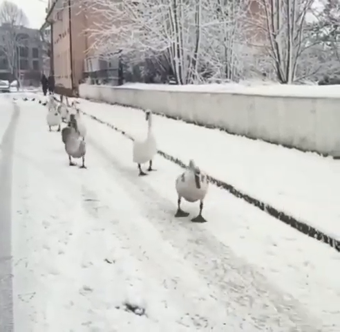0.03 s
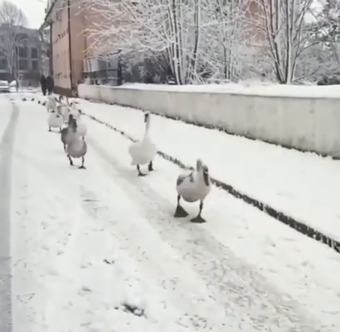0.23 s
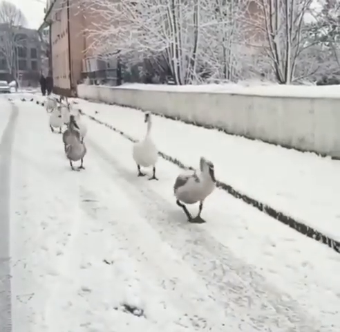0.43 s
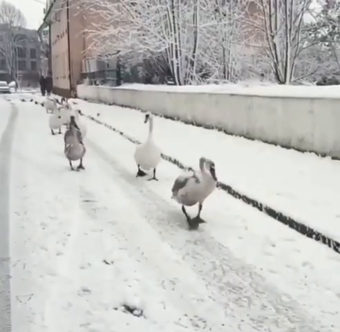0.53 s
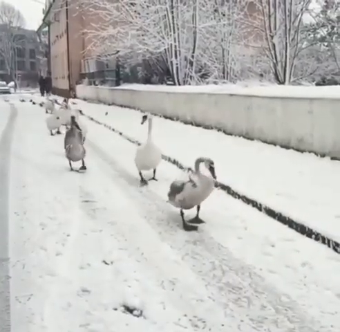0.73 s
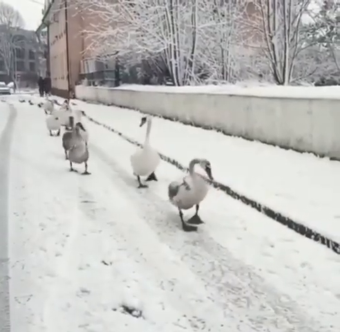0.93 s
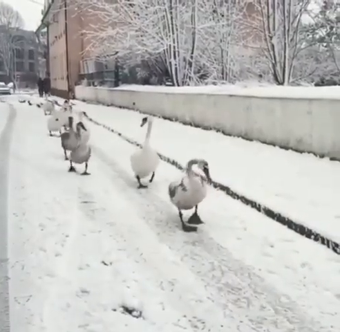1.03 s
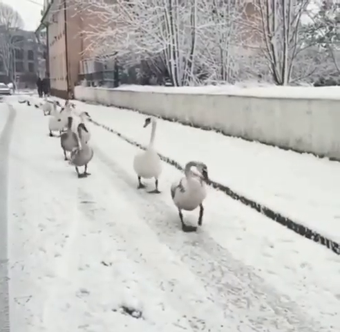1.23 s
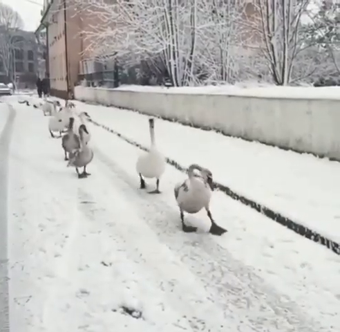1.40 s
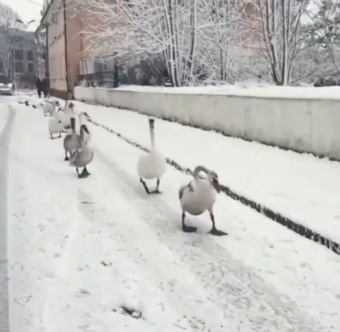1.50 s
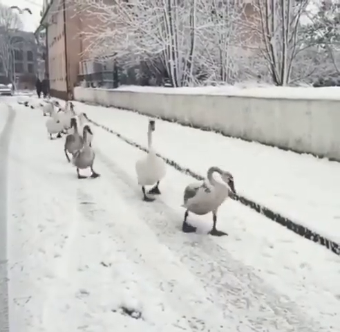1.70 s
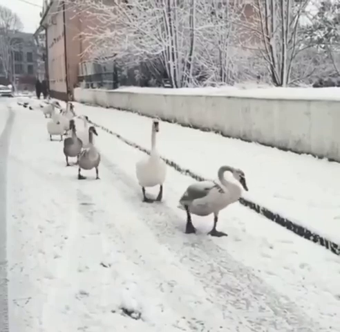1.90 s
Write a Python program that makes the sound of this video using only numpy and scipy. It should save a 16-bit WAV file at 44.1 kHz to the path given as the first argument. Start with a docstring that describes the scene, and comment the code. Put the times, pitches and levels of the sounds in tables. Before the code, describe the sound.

A young swan hisses once, harsh and fluttering, then the breath sinks in tone and fades. Soft webbed footfalls pat the snow near the end, over steady far traffic rumble outdoors; mono microphone.

```python
"""A low street rumble is heard first; a third of a second in, a young swan hisses once on a snowy street.
The hiss is rough, fluttering air noise ringing in the windpipe, whose resonances sink as the neck bends and
the breath fades. Webbed feet pat the snow as short bursts of grainy noise. Far traffic is filtered noise, an
idling engine is narrow noise bands and a wavering tone, and house fronts echo faintly. Mono microphone."""
import sys
import numpy as np
from scipy import signal
from scipy.fft import rfft, irfft, next_fast_len
from scipy.io import wavfile
from scipy.ndimage import uniform_filter1d, map_coordinates

SR = 44100
rng = np.random.default_rng(int(sys.argv[2]) if len(sys.argv) > 2 else 0)


def store_wav(level_fs):
    """Save 16-bit WAV to argv[1]."""
    pcm = np.round(np.clip(np.atleast_2d(level_fs), -1, 1) * 32767)
    wavfile.write(sys.argv[1], SR, pcm.T.astype(np.int16))


N = 85995  # length [samples]

# Course of the hiss: (time [s], level before flutter [dB], treble shelf [dB], lowest windpipe resonance [Hz],
# base frequency of the dips [Hz], mouth closing [0-1])
HISS_COURSE = [(.333, -60, 2, 930, 3150, .4), (0.343, -49.5, -3, 950, 3190, 0.33),
               (.351, -47.5, -1, 963, 3260, 0.5), (0.356, -37, -3.5, 1037, 3210, 0.26),
               (.378, -35.5, -0.5, 1106, 3260, 0), (.4, -34.5, -2.5, 1156, 3430, 0),
               (.445, -30.5, -0.5, 1151, 3410, 0), (.49, -35, -9.5, 1168, 3340, 0),
               (.52, -32, 1.5, 1152, 3372, 0.02), (.555, -34, -2, 1149, 3400, 0.02),
               (.585, -35, -4.5, 1147, 3420, 0.16), (.63, -36, -4.5, 1133, 3376, 0.22),
               (.72, -35, -2.5, 1026, 3267, 0.35), (.835, -36.5, -4, 1003, 3080, 0.61),
               (.87, -40.5, -8.5, 953, 3050, 0.83), (1.0, -43, -8, 835, 2960, 0.79),
               (1.07, -46.5, -6, 700, 2870, 0.71), (1.1, -47, -5, 682, 2710, 1),
               (1.2, -47.5, -13, 640, 2800, 0.99), (1.35, -52, -8.5, 565.5, 2730, 0.84),
               (1.5, -56.5, -12.5, 476, 2580, 0.68), (1.57, -66, -5, 428, 2600, 0.98)]
# Windpipe resonances: (multiple of the lowest [ratio], width [Hz], level with mouth open [dB],
# half closed [dB], closed [dB])
WINDPIPE = [(1.0, 51, -1, -8.5, -3.5), (1.99, 71, 4, -11, 7.5), (2.72, 55, 4, -8.5, 7),
            (3.65, 220, -3.5, -5, -16.5), (4.4, 420, -4, -8.5, -23), (4.8, 160, 1.5, -6.5, -30),
            (5.4, 80, -3.5, -2, -18), (6.38, 640, 3.5, -21, -5.5)]
# Fixed resonances of mouth and beak: (frequency [Hz], width [Hz], level with mouth open [dB],
# half closed [dB], closed [dB])
BEAK_RESONANCES = [(1450, 500, -12, -5, -13), (1800, 200, -5, -5, -8), (2050, 70, -1, 0, -10),
                   (2250, 300, -10, -4, -11), (2800, 400, -11, -8, -18), (3700, 90, -14, -6, -3),
                   (3950, 350, -12, -3, -12), (4550, 500, -14, -6, -11), (5500, 700, -11, -9, -16),
                   (6400, 900, -22, -16, -22)]
# Moving dips in the hiss spectrum: (multiple of the base dip frequency [ratio], width before breathing [Hz],
# gain with mouth open [dB], half closed [dB], closed [dB])
HISS_DIPS = [(.768, 148, -16.5, 3, -3.5), (.99, 310, -22.5, -34.5, -5), (1.352, 300, -38, 5, 0.5),
             (1.65, 128.7, -26.5, -1.5, -2), (1.97, 200, -14, -22, -10.5)]
# Upper edge of the tract: (mouth open [Hz], half closed [Hz], closed [Hz])
TRACT_TOP_HZ = (6690, 6650, 6230)
# Throat flutter: (time [s], rate before waver [Hz], depth of the puffs [ratio])
THROAT_FLUTTER = [(.35, 77, .2), (.44, 76, .7), (.52, 74, .4), (.62, 65, .6), (.72, 63, .6), (.9, 60, .1)]
# Footfalls: (time [s], peak of the envelope [dB])
FOOTFALLS = [(.975, -61), (1.139, -52), (1.374, -55.5), (1.601, -62), (1.658, -59), (1.73, -56),
             (1.795, -71)]
# Spectrum of trodden snow: (frequency [Hz], relative level [dB])
SNOW_SPECTRUM = [(400, -8), (1200, -2.5), (2200, 2), (4500, -1.5), (8000, -10.5)]
# Course of the street, before the rumble trim: (time [s], level [dB])
STREET_COURSE = [(0.0, -50), (0.276, -48), (0.884, -43.5), (0.9, -45), (1.216, -45.5), (1.548, -48),
                 (1.568, -44), (1.726, -47.5), (1.95, -48.5)]
# Spectrum of the far traffic: (frequency [Hz], relative level [dB])
RUMBLE_SPECTRUM = [(20, -28.5), (33, -10.5), (48, 0.5), (60, 1.5), (110, -2), (170, -7.5), (250, -6),
                   (320, -11), (420, -15.5), (500, -19), (650, -23.5)]
# Spectrum of the city air: (frequency [Hz], relative level [dB])
AIR_SPECTRUM = [(350, -7), (600, -3), (900, -6), (1280, 2.5), (1600, -5.5), (2300, -6.5), (2900, -13),
                (5000, -14.5), (7000, -17.5), (8000, -17.5)]
# Course of the city air: (time [s], level [dB])
AIR_COURSE = [(0, -60.5), (.3, -61.5), (1.6, -60), (1.76, -56.5), (1.82, -60), (1.95, -64)]
# Engine lines, before they follow the street course: (frequency [Hz], width [Hz], level [dB])
ENGINE_LINES = [(57.5, 4.7, -64), (75.6, 5.1, -59.5), (106.65, 5.2, -54), (156.9, 15, -57),
                (233.6, 18, -61)]
# Course of the engine drone, before flicker: (time [s], level [dB])
DRONE_COURSE = [(0, -73.5), (.3, -56.5), (.55, -65.5), (.65, -53), (.8, -60.5), (.96, -66.5), (1.03, -48.5),
                (1.085, -59), (1.14, -46), (1.2, -52), (1.28, -44), (1.36, -50.5), (1.44, -60.5),
                (1.53, -73.5), (1.58, -54), (1.9, -52.5), (1.95, -62)]

# Tract: spectral edges, third windpipe resonance, and the brief extra resonance
LOW_EDGE, TREBLE_HZ, BREATH_DB = 0.76, 3160, -16  # low edge as a share of the lowest resonance
PIPE_THIRD_RISES = 0.32  # added to the third multiple as the mouth closes
PUFF_HZ, PUFF_WIDE_HZ, PUFF_DB, PUFF_FADE_S, PUFF_S = 2100, 200, 8, .016, 0.368
# Random motion: each depth multiplies a smooth random curve; rates are in knots per second
BREAK_DB, BREAK_RATE = 1.5, 30
DIP_WANDER_HZ, DIP_BREATHE_DB, DIP_RATE = 40, 2.5, 20
DIP_SQUARE = 3  # higher: flatter floor, steeper sides
RASP_DB, RASP_RATE, PATCHY_DB = 1.5, 700, 2.5
FLUTTER_WAVER_HZ, FLUTTER_NARROW, SNAP_DB = 2.5, 6, -11  # narrow: higher makes each puff shorter
STEP_RISE_S, STEP_FALL_S, GRAINS_DB = 0.014, 0.014, 3
RUMBLE_DB = -1  # trim on the street course
DRONE_HZ, DRONE_WAVER_HZ, DRONE_FLICKER_DB = 276.9, 2.66, 1.5
STREET_ECHO_DB, STREET_T60_S = -28, .3
TOP_HZ, TOP_SOFT_HZ = 8050, 7800  # hard limit and soft shoulder of the treble
FRAME, HOP = 1024, 256  # short-time spectrum [samples]


def swan():
    """Source and filter: fluttering turbulence and its snaps excite the moving tract."""
    level_db = curves(HISS_COURSE)[0]
    rate, depth = curves(THROAT_FLUTTER)
    cycles = np.cumsum(rate + FLUTTER_WAVER_HZ * wobble(30)) / SR
    puffs = 1 + depth * np.exp(FLUTTER_NARROW * (np.cos(2 * np.pi * cycles) - 1))
    # one impulse at the top of each puff
    clicks = unit(np.diff(np.floor(cycles), prepend=0))
    snaps = depth * amp(SNAP_DB) * clicks
    rasp = amp(RASP_DB * wobble(RASP_RATE))
    air = rng.standard_normal(N) * rasp * puffs
    hiss = shaped(unit(air) + snaps, tract, PATCHY_DB)
    start, end = HISS_COURSE[0][0], HISS_COURSE[-1][0]
    sounding = np.abs(np.arange(N) / SR - (start + end) / 2) < (end - start) / 2
    return hiss * amp(level_db) * sounding


def tract(f, t):
    """Resonance: pipe and beak modes add power; moving bands mostly thin the hiss, a few gains lift it."""
    _, treble_db, low, dip, shut = curves(HISS_COURSE, t)

    def by_mouth(values):
        return np.interp(shut, [0, .5, 1], values)

    def mix(db):
        return amp(2 * by_mouth(db))  # power

    def drift(rate):
        return np.interp(t, np.arange(N) / SR, wobble(rate))

    def mode(hz, width, db):
        swell = amp(2 * BREAK_DB * drift(BREAK_RATE))  # each resonance swells and breaks on its own
        return mix(db) * swell * peak(f, hz, width) ** 2

    power = amp(2 * BREATH_DB)  # flat breath under the resonances
    for i, (multiple, width, *db) in enumerate(WINDPIPE):
        rise = PIPE_THIRD_RISES * shut * (i == 2)
        power = power + mode(low * (multiple + rise), width, db)
    for hz, width, *db in BEAK_RESONANCES:
        power = power + mode(hz, width, db)
    puff_course = np.exp(-np.abs(t - PUFF_S) / PUFF_FADE_S)
    power = power + amp(2 * PUFF_DB) * puff_course * peak(f, PUFF_HZ, PUFF_WIDE_HZ) ** 2

    # each dip drifts, narrows and widens
    for multiple, width, *db in HISS_DIPS:
        centre = multiple * dip + DIP_WANDER_HZ * drift(DIP_RATE)
        breathing_width = width * amp(DIP_BREATHE_DB * drift(DIP_RATE))
        shape = np.exp(-np.abs(2 * (f - centre) / breathing_width) ** DIP_SQUARE)
        power = power * mix(db) ** shape

    power = power / (1 + (LOW_EDGE * low / (f + 1)) ** 16)
    power = power * amp(2 * treble_db / (1 + (TREBLE_HZ / (f + 1)) ** 8))
    power = power * (f < TOP_HZ) / (1 + (f / by_mouth(TRACT_TOP_HZ)) ** 40)
    return np.sqrt(np.abs(power) / power.mean(0))  # mean power 1 in every frame


def feet():
    """Granular friction: grainy noise under a quick exponential rise and fall gives soft pats."""
    t = np.arange(N) / SR
    envelope = np.zeros(N)
    for start, db in FOOTFALLS:
        time_constant = np.where(t < start, STEP_RISE_S, STEP_FALL_S)
        envelope += amp(db) * np.exp(-np.abs(t - start) / time_constant)
    grains = rng.standard_normal(N) * amp(GRAINS_DB * wobble(440))
    return envelope * unit(coloured(grains, SNOW_SPECTRUM))


def echo(x):
    """Diffuse reflection: house fronts answer with an exponentially decaying noise tail of unit energy."""
    t = np.arange(SR // 2) / SR
    tail = rng.standard_normal(SR // 2) * amp(-60 * t / STREET_T60_S)
    delayed = np.pad(x, (600, 0))  # about 14 ms
    return signal.fftconvolve(delayed, tail / np.linalg.norm(tail))[:N]


def street():
    """Superposition of independent sources: far rumble, hushed city air and an idling engine."""
    level_db, = curves(STREET_COURSE)
    rumble_spectrum = RUMBLE_SPECTRUM + [(900, -54.5)]  # steep roll-off above the table
    rumble = amp(level_db + RUMBLE_DB) * patchy_noise(rumble_spectrum, patchy_db=1.5)
    air = amp(curves(AIR_COURSE)[0]) * patchy_noise(AIR_SPECTRUM, patchy_db=3)
    return rumble + air + engine_lines() * amp(level_db - level_db.mean()) + engine_drone()


def engine_lines():
    """Narrow-band noise: each resonance turns white noise into an unsteady low line."""
    lines = np.zeros(N)
    for hz, width, db in ENGINE_LINES:
        line = filtered(rng.standard_normal(N), lambda f: peak(f, hz, width))
        lines += amp(db) * unit(line)
    return lines


def engine_drone():
    """Frequency and amplitude modulation: one sine wavers in pitch and flickers in level."""
    level_db = curves(DRONE_COURSE)[0] + DRONE_FLICKER_DB * wobble(20)
    hz = DRONE_HZ + DRONE_WAVER_HZ * wobble(12)
    return np.sqrt(2) * amp(level_db) * np.sin(2 * np.pi * np.cumsum(hz) / SR)


def patchy_noise(spectrum, patchy_db):
    """Random noise made uneven in time and frequency, then coloured, at unit RMS."""
    noise = shaped(rng.standard_normal(N), lambda f, t: 1, patchy_db)
    return unit(coloured(noise, spectrum))


def coloured(x, spectrum):
    """Linear filtering by a tabulated spectrum, with nothing kept above the treble limit."""
    return filtered(x, lambda hz: amp(along(spectrum, hz)) * (hz < TOP_HZ))


def peak(f, centre, width):
    """Damped resonance: squared magnitude of a band-pass, 1 at its centre."""
    return (f * width) ** 2 / ((centre * centre - f * f) ** 2 + (f * width) ** 2)


def shaped(x, gain, patchy_db):
    """Time-varying filtering: short-time spectra take a gain of frequency and time, and random patches."""
    hz, t, z = signal.stft(x, SR, nperseg=FRAME, noverlap=FRAME - HOP)
    field = uniform_filter1d(rng.standard_normal(z.shape), size=3, axis=0)  # smooth over frequency
    field = uniform_filter1d(field, size=12, axis=1)  # smooth over time
    z = z * gain(hz[:, None], t) * amp(patchy_db * unit(field))
    return signal.istft(z, SR, nperseg=FRAME, noverlap=FRAME - HOP)[1][:N]


def filtered(x, response):
    """Convolution theorem: the spectrum of x is multiplied by a response of frequency."""
    m = next_fast_len(N + SR // 2)
    return irfft(rfft(x, m) * response(np.fft.rfftfreq(m, 1 / SR)), m)[..., :N]


def wobble(rate):
    """Slow randomness: a smooth curve through random knots, rate of them a second."""
    knots = rng.standard_normal(int(N * rate / SR) + 4)
    return map_coordinates(knots, [np.arange(N) * rate / SR])


def curves(rows, t=None):
    """Linear interpolation in time: each column after the first, read at t or at every sample."""
    times, *columns = np.transpose(rows)
    t = np.arange(N) / SR if t is None else t
    return [np.interp(t, times, column) for column in columns]


def along(points, hz):
    """Interpolation of (frequency [Hz], level [dB]) points on a logarithmic frequency axis."""
    f, db = np.transpose(points)
    return np.interp(np.log(hz + 1), np.log(f + 1), db, left=-120)


def amp(db):
    """Decibel law: amplitude ratio of a level in dB."""
    return 10 ** (np.asarray(db) / 20)


def unit(x):
    """Normalisation to an RMS of 1."""
    return x / np.sqrt(np.mean(np.abs(x) ** 2) + 1e-20)


def scene():
    """Superposition: near sounds, their echo and the street reach both channels alike."""
    near = swan() + feet()
    mono = near + amp(STREET_ECHO_DB) * echo(near) + street()
    return np.array([mono, mono])


def record(dry):
    """Band limitation: the microphone fades in the top treble and keeps nothing above its limit."""
    return filtered(dry, lambda hz: (hz < TOP_HZ) / np.sqrt(1 + (hz / TOP_SOFT_HZ) ** 24))


dry = scene()
out = record(dry)
store_wav(out)
```